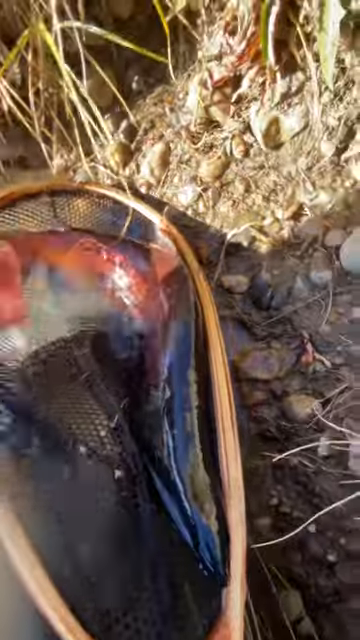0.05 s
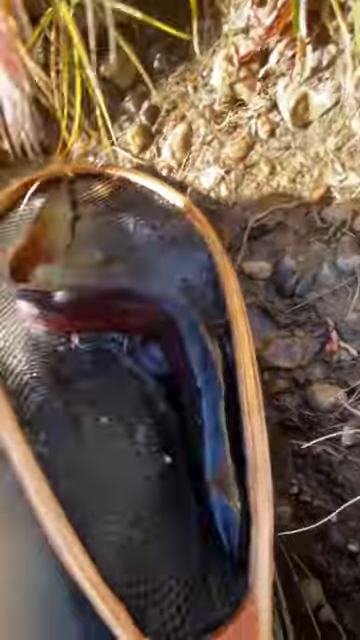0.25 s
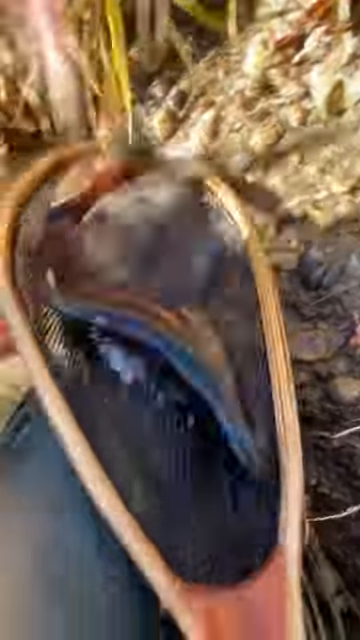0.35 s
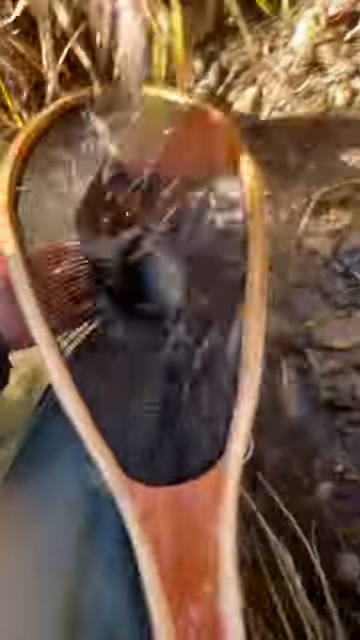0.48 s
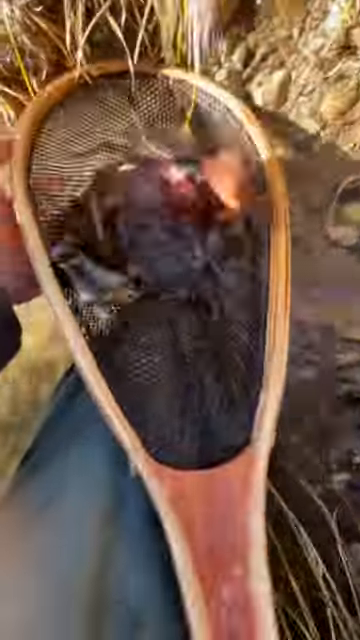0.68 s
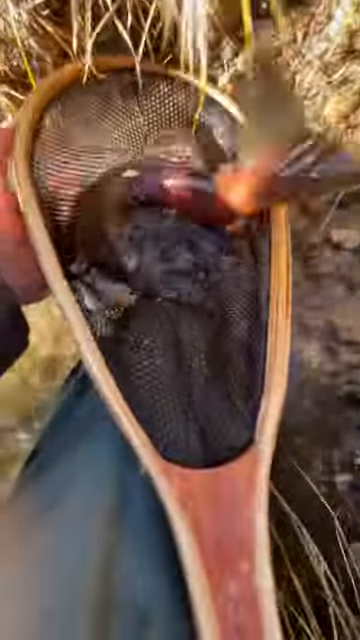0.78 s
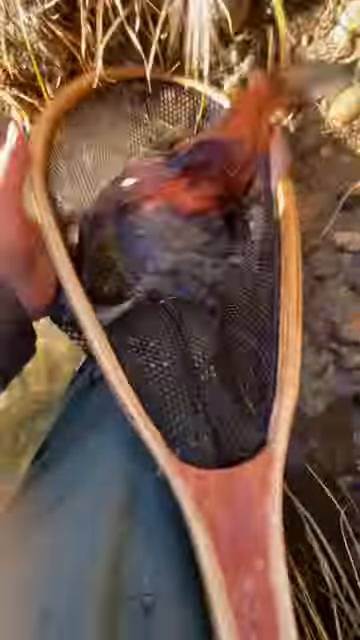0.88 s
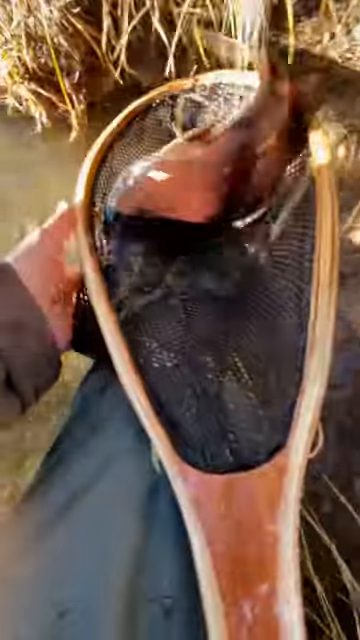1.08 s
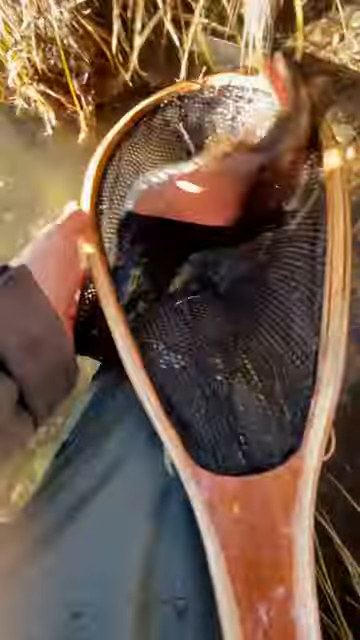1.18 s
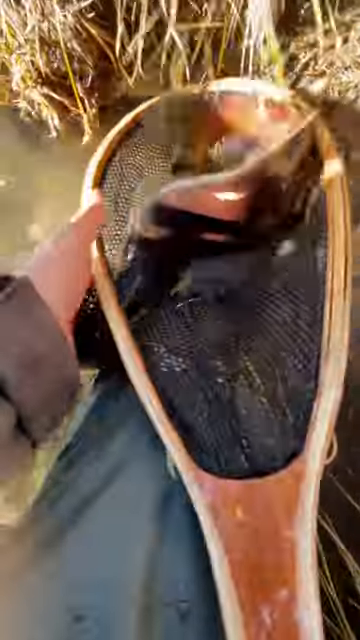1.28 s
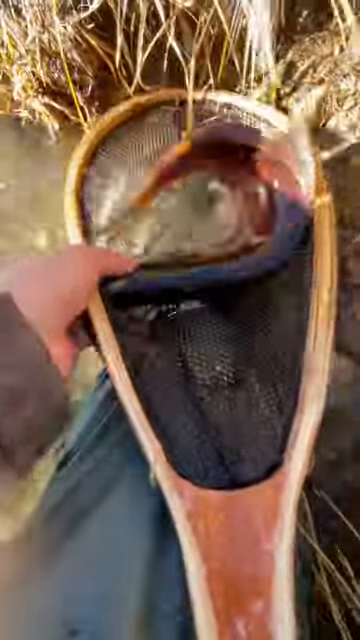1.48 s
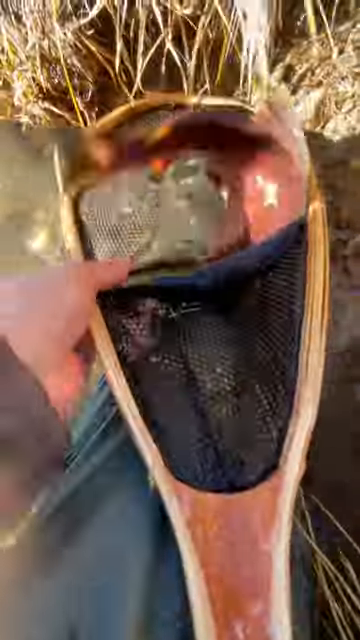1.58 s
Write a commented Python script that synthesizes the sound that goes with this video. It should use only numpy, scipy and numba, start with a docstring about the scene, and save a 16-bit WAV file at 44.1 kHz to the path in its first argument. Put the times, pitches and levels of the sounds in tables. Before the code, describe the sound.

A fish thrashes in a wet landing net, heard very close outdoors: a faint swish, a sudden hard splashy slap, bubbly gurgling and soft thumps, then quieter scattered flaps and droplet ticks over a faint watery hiss.

```python
"""A fish thrashes in a wet landing net, close under two microphone ports, beside a stream.
Its tail slaps water and mesh (bursts of droplet noise in three bands); trapped air rings as bubbles and
the body thumps (short gliding sines). Water sloshes, and mesh, spray and stream sizzle (noise with tiny
rings); wet mesh swishes through air and the net rumbles (shaped noise). Each pitch reaches the two ports
with a different phase."""
import sys
import numpy as np
from scipy import signal
from scipy.fft import rfft, irfft
from scipy.io import wavfile
from scipy.ndimage import uniform_filter1d
from numba import njit

SR = 44100
rng = np.random.default_rng(int(sys.argv[2]) if len(sys.argv) > 2 else 0)


def master(y):
    """Save y as 16-bit WAV."""
    cut = np.clip(np.atleast_2d(y).T, -1, 1)
    pcm = np.round(cut * 32767)  # scale
    wavfile.write(sys.argv[1], SR, pcm.astype(np.int16))


def ratio_of_db(decibels):
    """Turn decibels (scalar or array-like) into linear amplitude factors; 0 dB maps to 1."""
    return 10 ** (np.asarray(decibels, float) / 20)


N = 72765

# Slaps of tail and water. Each row: time in seconds, gain in dB of the middle band (2.5-6.5 kHz),
# of the low band (0.8-2.93 kHz) and of the top band (above 6.5 kHz), 60 dB decay time in seconds.
SLAP_EVENTS = [(0.274, -26, -61, -38.5, 0.013), (0.2887, -13, -26.5, -24, 0.02),
               (0.295, -40, -28, -52, 0.026), (0.307, -41, -35, -50, 0.077),
               (0.3286, -29.5, -38, -51, 0.073), (0.3442, -38, -30, -59, 0.06),
               (0.3596, -45, -24.5, -52, 0.054), (0.4434, -38, -38, -39, 0.055),
               (0.4573, -47, -35, -57, 0.043), (0.4927, -44, -41, -62, 0.032),
               (0.522, -62, -41, -45, 0.036), (0.5315, -32.5, -33.5, -37, 0.022),
               (0.537, -38.5, -31.5, -35, 0.018), (0.5539, -35.5, -40.5, -30, 0.019),
               (0.584, -56, -58, -36, 0.0056), (0.5887, -60, -35, -64, 0.022),
               (0.5906, -44, -50, -39, .025), (0.6283, -41, -69, -45, 0.016),
               (0.7795, -37, -42, -63, 0.025), (0.7833, -38.5, -50.5, -72, 0.038),
               (0.8036, -49, -59, -46, 0.044), (0.902, -66, -38.5, -67, 0.028),
               (0.9214, -56, -55, -51, 0.033), (0.9537, -39.5, -44, -45, 0.044),
               (1.141, -67, -51, -41, 0.033), (1.1712, -37.5, -42.5, -26.5, 0.029),
               (1.179, -53, -53, -47, .025), (1.2244, -40, -51, -44, 0.068),
               (1.234, -36.5, -46, -27.5, 0.018), (1.2385, -41, -54, -57, 0.04),
               (1.2543, -32.5, -41.5, -50, 0.031), (1.2783, -40, -68, -36.5, 0.021),
               (1.2842, -41, -56, -39.5, 0.029), (1.314, -49, -46.5, -57, .05),
               (1.318, -38, -43, -51, 0.035), (1.34, -49, -63, -44, 0.011), (1.358, -33.5, -60, -40, 0.013),
               (1.371, -63, -44.5, -41, 0.054), (1.474, -60, -43, -49, 0.031),
               (1.4833, -42, -70, -56, 0.021), (1.6166, -45, -41, -30, 0.017)]
# Spectrum of a slap. Each row: frequency in Hz, relative level in dB per Hz.
SLAP_SPECTRUM = [(300, -45), (600, -6), (1000, -2.5), (1310, -7), (1650, -7.5), (2080, -3.5), (3480, -3.5),
                 (5900, -1.5), (7100, -4.5), (8700, -1.5), (11000, -8.5), (13500, -9.5), (15700, -13),
                 (16600, -59)]
# Ringing air bubbles. Each row: start in seconds, first pitch in Hz, pitch after one length in Hz,
# length in seconds, peak in dB before the wobble.
BUBBLE_RINGS = [(.2895, 2080, 2090, 0.0048, -11.5), (.2895, 1280, 1340, 0.0044, -17),
                (.312, 987, 861, 0.016, -25), (.336, 1760, 1900, 0.0074, -26), (.345, 950, 1060, 0.02, -36),
                (.362, 1076, 990, 0.018, -29), (.384, 1070, 1020, 0.013, -32.5),
                (.344, 1990, 1800, 0.0067, -22.5), (.3605, 1370, 1720, 0.0053, -25),
                (.353, 2150, 2560, 0.0056, -23), (.3595, 2766, 2600, 0.0048, -19),
                (.304, 1330, 1370, 0.0047, -27), (.304, 2000, 2050, 0.0064, -28),
                (.369, 1376, 1250, 0.013, -27), (.457, 820, 830, 0.0077, -40),
                (.490, 1340, 1340, 0.009, -38), (.490, 1760, 1730, 0.0066, -35),
                (.535, 630, 698, 0.011, -31.5), (.546, 1330, 1490, 0.0096, -34.5),
                (.5735, 880, 1313, 0.013, -25), (.588, 520, 393, 0.0087, -35),
                (.639, 4900, 5220, 0.0038, -32), (.6425, 5200, 5270, 0.003, -41),
                (.6495, 2160, 2350, 0.0051, -46), (.671, 2000, 2140, 0.0036, -39.5),
                (.422, 1720, 1780, 0.0049, -32), (.686, 2330, 2170, 0.0036, -42),
                (.706, 3200, 3500, 0.0042, -44.5), (.7115, 4470, 4400, 0.0035, -43),
                (.589, 770, 710, 0.011, -36), (.735, 2260, 2290, 0.0047, -50),
                (.764, 800, 686, 0.0087, -49.5), (.783, 673, 723, 0.026, -47),
                (.803, 2610, 2610, 0.004, -34.5), (.884, 2230, 2250, 0.0077, -46),
                (1.1712, 8440, 8040, 0.0019, -14.5), (1.2795, 5250, 5500, 0.0019, -28),
                (.781, 5700, 5600, 0.003, -34), (.783, 3840, 3900, .006, -31),
                (1.2555, 2300, 2480, 0.0024, -31.5), (1.38, 514, 456, 0.013, -39.5),
                (.07, 770, 895, 0.045, -49), (.187, 2250, 2210, 0.014, -43),
                (1.2455, 3820, 4180, 0.0035, -27), (1.2455, 2800, 2900, 0.0044, -32),
                (1.344, 1070, 1020, 0.0067, -45), (1.354, 783, 1121, 0.018, -29),
                (1.506, 1800, 1880, .005, -42), (1.641, 2500, 2600, 0.0049, -44),
                (.52, 790, 650, 0.0096, -35.5), (.905, 664, 664, 0.024, -49),
                (1.37, 1690, 1660, 0.0071, -33), (1.371, 2100, 2093, 0.0066, -34.5)]
# Thumps of the body. Each row: start in seconds, first pitch in Hz, pitch after one length in Hz,
# length in seconds, peak in dB before the wobble.
BODY_THUMPS = [(.06, 62, 55, 0.036, -53), (.07, 188, 189, 0.039, -53.5), (.41, 113, 107.7, 0.044, -53),
               (1.025, 61, 55, 0.04, -54), (1.17, 338, 338, 0.033, -54), (1.58, 104, 60, 0.026, -42),
               (.165, 173, 157, 0.048, -50), (.214, 185, 148, 0.017, -30), (.23, 66.3, 60.6, 0.051, -44.5),
               (.275, 199, 197, 0.014, -34), (.296, 208, 198, 0.042, -30.5), (.30, 131, 138, 0.0296, -32.5),
               (.328, 183, 253, 0.024, -33.5), (.362, 290, 355, 0.018, -39.5),
               (.35, 76.6, 70.5, 0.068, -43.5), (.536, 100, 89.5, 0.024, -39), (.535, 377, 300, 0.015, -38),
               (.54, 220, 197, 0.011, -40.5), (1.258, 76, 52, 0.031, -41.5), (1.47, 325, 347, 0.027, -55.5),
               (.589, 290, 253, 0.015, -38), (.59, 60, 56, 0.054, -49), (.782, 182, 180, 0.018, -37),
               (.905, 171, 177, 0.018, -43), (1.247, 169, 85, 0.014, -38.5), (1.387, 206, 70, 0.023, -28.5),
               (1.426, 283, 202, 0.01, -43), (1.55, 180, 100, 0.028, -43.5),
               (1.619, 200, 161, 0.016, -46.5)]
# Churn of water and mesh. Each row: time in seconds, slosh level in dB, sizzle level in dB,
# left minus right in dB for the whole mix.
CHURN_COURSE = [(0, -64, -66, 2), (.03, -62, -61, -1), (.055, -52.5, -47.5, 0.5), (.13, -53.5, -48.5, .5),
                (.175, -44.5, -40.5, 0), (.25, -48.5, -48, -0.5), (.275, -41, -38, -0.5),
                (.33, -35, -38.5, .5), (.39, -39.5, -39.5, -0.5), (.47, -42.5, -45.5, 0),
                (.51, -49, -52, -2), (.56, -46, -48, 1), (.6, -43.5, -52.5, -1.5),
                (.625, -54.5, -51.5, -3.5), (.69, -57.5, -54.5, 0), (.755, -60.5, -56.5, -1),
                (.79, -47.5, -53, -1.5), (.845, -54.5, -45, 0), (.86, -61, -56.5, 0), (.93, -50, -51, -1.5),
                (.99, -53, -51.5, 0.5), (1.06, -58.5, -58.5, 0.5), (1.12, -55.5, -53, 0.5),
                (1.2, -50.5, -47, 0), (1.265, -52.5, -51.5, -2), (1.305, -54.5, -56.5, -1),
                (1.35, -48.5, -52, -2), (1.41, -49.5, -47, 0), (1.46, -51, -50, 0), (1.52, -49, -49, 1),
                (1.556, -50, -49, 2.5), (1.585, -52.5, -54.5, -1.5), (1.605, -56, -46, -1.5),
                (1.65, -59, -51.5, -2)]
# Spectrum of the sloshing water. Each row: frequency in Hz, relative level in dB per Hz.
SLOSH_SPECTRUM = [(180, -5), (300, -11.5), (600, -19.5), (690, -7.5), (946, -7.5), (1050, -6.5), (1410, -9),
                  (1830, -7.5), (4000, -9), (5200, -22.5), (8800, -120)]
# Spectrum of sizzling mesh, spray and stream. Each row: frequency in Hz, relative level in dB per Hz.
SIZZLE_SPECTRUM = [(900, -48), (2000, -4), (3300, -26), (4500, -2.5), (5750, 3), (6600, -3.5), (7500, -3.5),
                   (9000, -2.5), (10700, -4.5), (12500, -9.5), (14000, -15.5), (15700, -7), (16200, -52),
                   (16600, -64)]
# Wet mesh swept through air. Each row: time in seconds, level in dB.
SWISH_COURSE = [(.02, -67), (.05, -49.5), (.1, -43.5), (.13, -47), (.17, -51), (.23, -69), (.27, -66)]
# Spectrum of the swish. Each row: frequency in Hz, relative level in dB per Hz.
SWISH_SPECTRUM = [(4200, -15), (5000, -10), (5700, -3), (6300, -5), (7000, -39)]
# Rumble of the net over time. Each row: time in seconds, level in dB.
RUMBLE_COURSE = [(0, -75), (.05, -67), (.12, -61), (.246, -53), (.35, -44.5), (.454, -57), (.55, -50),
                 (.61, -56), (.64, -65), (.755, -73), (.79, -56.5), (.972, -58), (1.05, -60.5),
                 (1.168, -51.5), (1.31, -61), (1.42, -53.5), (1.538, -54.5), (1.65, -56)]
# Spectrum of the rumble. Each row: frequency in Hz, relative level in dB per Hz.
RUMBLE_SPECTRUM = [(12, -50), (20, -55), (60, -5.5), (258, -17.5), (343, -8), (425, -11.5), (449, -16),
                   (500, -16), (650, -14.5), (1100, -120)]
# Phase by which the left port leads the right. Each row: frequency in Hz, lead in radians for the fish,
# lead in radians for the hiss around it.
PORT_LEAD = [(0, 0, 0), (340, .1, .1), (700, -.4, 1.8), (1030, -.3, 1.7), (1460, .3, 1.3), (1800, .5, 1.0),
             (2150, .8, 1.6), (2700, 1.7, 2.6), (3450, 2.0, 2.2), (3960, 1.4, 1.4), (4740, 1.3, 1.3),
             (5430, .75, .75), (6200, 1.6, 1.5), (6900, 2.85, 2.85), (8000, 3.8, 3.7), (9130, 4.9, 4.9),
             (10250, 6.25, 6.25), (11300, 6.6, 6.6), (12400, 8.6, 8.6), (13800, 9.6, 9.6),
             (15300, 11.1, 11.1), (16400, 12.3, 12.3)]
# Sensitivity of the two ports. Each row: frequency in Hz, left minus right in dB.
PORT_DIFFERENCE = [(60, 3.5), (110, -2), (200, -3), (380, -2), (700, 2), (1290, 3), (2380, 0.0), (4400, 0),
                   (8120, 0), (15000, 0.0)]


def columns(table):
    """A table is transposed so that each quantity becomes one array."""
    return np.array(table, float).T


def shape(x, spectrum, lo_hz=0, hi_hz=np.inf):
    """Linear filtering: noise takes the given spectrum inside a soft-edged band, at rms near 1."""
    f = np.fft.rfftfreq(N, 1 / SR) + 1  # 1 Hz offset avoids log(0)
    hz, db = columns(spectrum)
    colour = ratio_of_db(np.interp(np.log(f), np.log(hz), db))
    g = colour / np.sqrt((1 + (lo_hz / f) ** 10) * (1 + (f / hi_hz) ** 10))
    coloured = irfft(rfft(x) * g / np.sqrt(np.mean(g ** 2)), N)
    return coloured / np.sqrt(np.mean(x ** 2))


def flicker(rate_hz, db):
    """Random modulation: a smoothed staircase of random steps gives a gain wandering on the scale of db."""
    k = int(SR / rate_hz)
    steps = np.repeat(rng.standard_normal(N // k + 1), k)
    smooth = uniform_filter1d(uniform_filter1d(steps, k), k)[:N]
    return ratio_of_db(db * 1.12 * smooth)


def course(seconds, db):
    """Amplitude envelope: levels in dB are joined by straight lines over time."""
    return ratio_of_db(np.interp(np.arange(N) / SR, seconds, db))


@njit
def ring_all(n, start, step, decay, glide, size):
    """Superposition of damped oscillators, each a gliding sine with exponential decay."""
    out = np.zeros(n)
    for k in range(len(start)):
        phase, turn, a, rise = 0., step[k], size[k], 1.
        for i in range(start[k], n):
            phase, turn = phase + turn, turn * glide[k]
            a, rise = a * decay[k], rise * decay[k] ** 4
            out[i] += a * (1 - rise) * np.sin(phase)
            if a < size[k] / 200:
                break
    return out


def fizz(rate_hz, lo_hz, hi_hz, cycles, spread_db, hiss):
    """Poisson process: tiny bubbles and droplets of random pitch, life and size over smooth noise."""
    u = rng.random((9000, 4))
    s = np.cumsum(-np.log(1 - u[:, 0])) / rate_hz
    u = u[s < N / SR]
    start = (s[:len(u)] * SR).astype(np.int64)
    hz = np.minimum(lo_hz * (hi_hz / lo_hz) ** u[:, 1], 16000)
    step = 2 * np.pi * hz / SR  # radians per sample
    life = cycles * (0.832 + 1.226 * u[:, 2]) * 2 * np.pi / step  # decay constant in samples
    size = ratio_of_db(spread_db * np.minimum(-np.log(1 - u[:, 3]), 3.5)) * step  # higher pitches are stronger
    # pitch rises by a fifth of its value in each life
    x = ring_all(N, start, step, np.exp(-1 / life), 1.2 ** (1 / life), size)
    return x / np.sqrt(np.mean(x ** 2)) + hiss * rng.standard_normal(N)


def even(x):
    """Automatic levelling: division by the rms over 2.2 ms keeps droplets at a more even strength."""
    local_power = uniform_filter1d(x ** 2, int(0.0022 * SR))
    return x / np.sqrt(local_power + 0.51 * np.mean(x ** 2)) * x.std()


def slaps():
    """Impact noise: each slap throws droplets in three bands, with a quick rise and exponential decay."""
    rise_s = 0.00085
    t, env = np.arange(N) / SR, np.zeros((3, N))
    for s, mid_db, low_db, top_db, t60 in SLAP_EVENTS:
        i = int((s - rise_s / 2) * SR)
        u = t[:min(SR // 8, N - i)]
        e = (1 - np.exp(-u / rise_s)) ** 2 * ratio_of_db(-60 * u / t60)
        gains = ratio_of_db(np.array([low_db, mid_db, top_db]))
        env[:, i:i + len(u)] += gains[:, None] * e / e.max()
    droplets = fizz(5000, 609.3, 16700, 2.514, spread_db=4, hiss=0.59)
    out = np.zeros(N)
    for e, (lo_hz, hi_hz) in zip(env, [(800, 2930), (2500, 6500), (6500, 60000)]):
        out += e * even(shape(droplets, SLAP_SPECTRUM, lo_hz, hi_hz))
    return out


def rings(table, rough):
    """Damped resonance: short gliding tones swell and die while churning water shakes strength and pitch."""
    out = np.zeros(N)
    shake, waver = flicker(350, rough * 1.3), flicker(350, rough * 0.3)
    bend, peak_share = 1.08, 0.33  # the glide is quickest at the start; the peak's place as share of length
    for s, hz0, hz1, length, db in table:
        i = int(s * SR)
        u = np.arange(int(2 * length * SR)) / (length * SR)  # time in lengths; a ring sounds for two
        u = u[:N - i]
        glide = np.tanh(bend * u) / np.tanh(bend)
        hz = (hz0 + (hz1 - hz0) * glide) * waver[i:i + len(u)]
        env = (u / peak_share * np.exp(1 - u / peak_share)) ** 1.54
        out[i:i + len(u)] += ratio_of_db(db) * env * np.sin(2 * np.pi * np.cumsum(hz) / SR)
    return out * shake


def bubbles():
    """Volume resonance: air trapped in the water rings at its own pitch."""
    return rings(BUBBLE_RINGS, rough=0.89)


def thumps():
    """Low damped resonance: the body's blows sound as deep gliding tones."""
    return rings(BODY_THUMPS, rough=0.57)


def rumble():
    """Low-frequency random vibration: the net gives slowly wandering noise of low pitch."""
    noise = shape(rng.standard_normal(N), RUMBLE_SPECTRUM)
    return course(*columns(RUMBLE_COURSE)) * flicker(15.4, 2.1) * noise


def slosh():
    """Bubble cloud: sloshing water is a sum of many small rings over smooth noise."""
    s, slosh_db, _, _ = columns(CHURN_COURSE)
    cloud = fizz(700, 596.2, 3975, 5.02, spread_db=4.0, hiss=2.06)
    return course(s, slosh_db) * flicker(40.02, 1.82) * shape(cloud, SLOSH_SPECTRUM)


def swish():
    """Aerodynamic noise: wet mesh swept through air gives a narrow band of noise."""
    return course(*columns(SWISH_COURSE)) * shape(rng.standard_normal(N), SWISH_SPECTRUM)


def sizzle():
    """Droplet noise: mesh, spray and stream sizzle as dense high rings over smooth noise."""
    s, _, sizzle_db, _ = columns(CHURN_COURSE)
    cloud = fizz(2000, 2432, 16860, 5.5, spread_db=2.76, hiss=1.26)
    return course(s, sizzle_db) * flicker(90, 1.5) * shape(cloud, SIZZLE_SPECTRUM)


def ports(near, side, lead):
    """Interaural-style differences: the two ports get opposite phase turns, balance and signs of side."""
    f = np.fft.rfftfreq(N, 1 / SR)
    hz, db = columns(PORT_DIFFERENCE)
    turn = np.exp(.5j * np.interp(f, columns(PORT_LEAD)[0], lead))
    g = turn * ratio_of_db(.5 * np.interp(np.log(f + 1), np.log(hz), db))
    scatter = ratio_of_db(6.5 * np.exp(-((f - 650) / 380) ** 2))  # the ports agree least around 650 Hz
    a, b = rfft(near), rfft(side) * scatter
    return np.array([irfft((a + b) * g, N), irfft((a - b) / g, N)])


def scene():
    """Partial coherence: fish and hiss have their own port phases, and part of each is unrelated."""
    _, fish_lead, hiss_lead = columns(PORT_LEAD)
    near_fish = slaps() + bubbles() + thumps() + rumble()
    side_fish = 0.3 * slaps() + 0.35 * rumble()
    fish = ports(near_fish, side_fish, fish_lead)
    near_hiss, side_hiss = [slosh() + sizzle() + swish() for _ in range(2)]
    side_share = 0.2  # of hiss power, before the scatter
    hiss = ports(np.sqrt(1 - side_share) * near_hiss, np.sqrt(side_share) * side_hiss, hiss_lead)
    s, _, _, left_db = columns(CHURN_COURSE)
    pan = course(s, .5 * left_db)
    return (fish + hiss) * [pan, 1 / pan]


def low_pass(x):
    """Removes everything above the highest recorded frequency."""
    return signal.sosfilt(signal.butter(12, 17130, fs=SR, output="sos"), x)


def record(dry):
    """Signal chain: the finished two-port mix passes to the output."""
    return low_pass(dry)


dry = scene()
out = record(dry)
master(out)
```